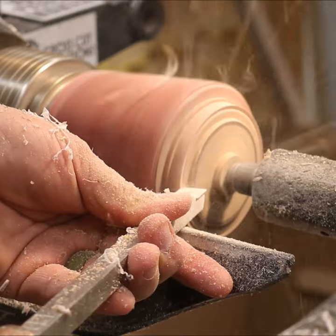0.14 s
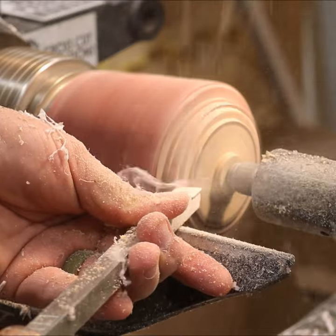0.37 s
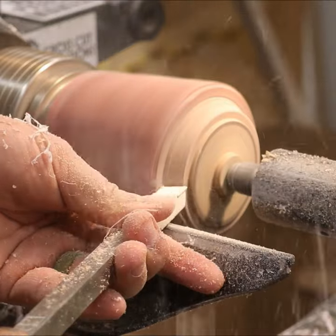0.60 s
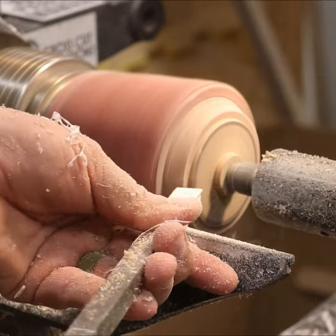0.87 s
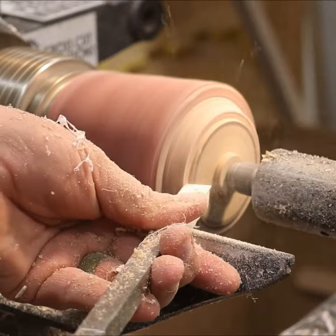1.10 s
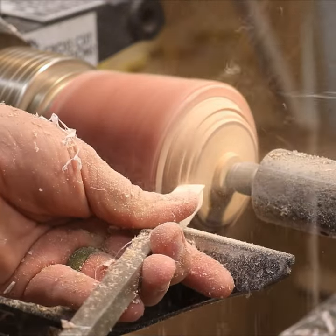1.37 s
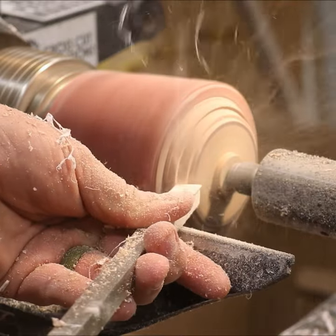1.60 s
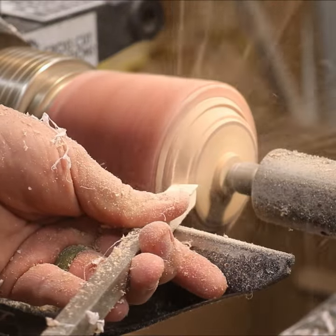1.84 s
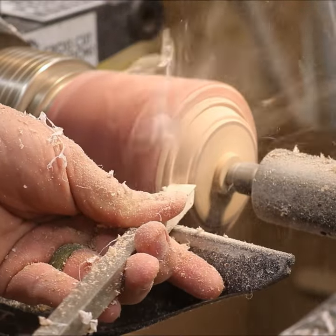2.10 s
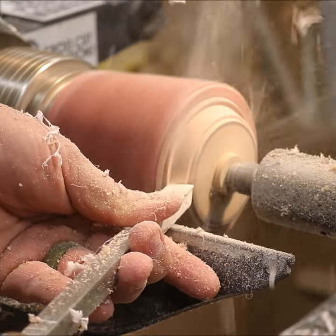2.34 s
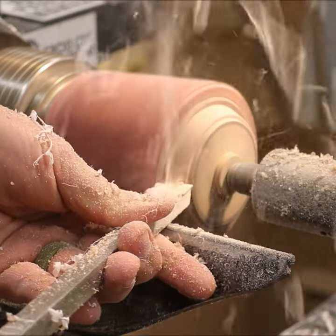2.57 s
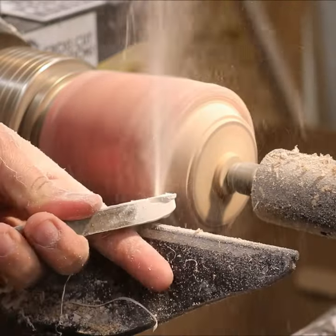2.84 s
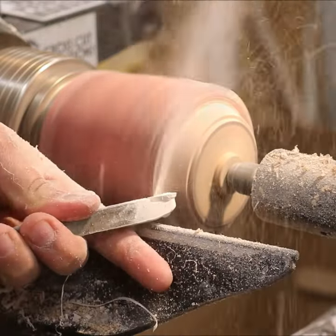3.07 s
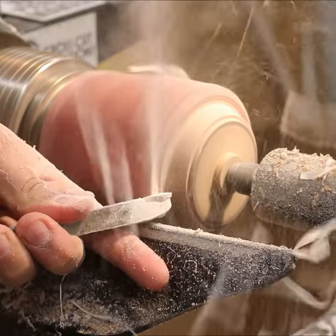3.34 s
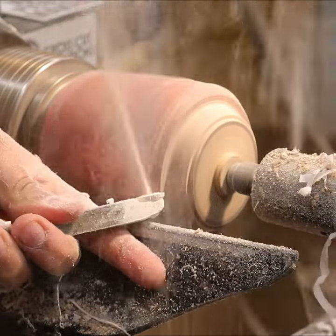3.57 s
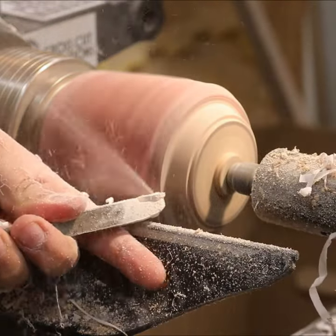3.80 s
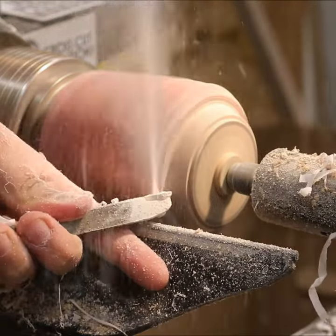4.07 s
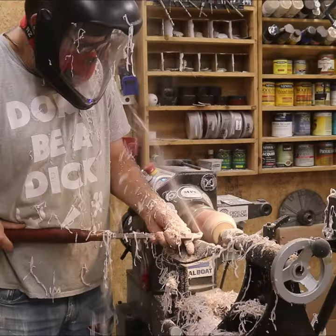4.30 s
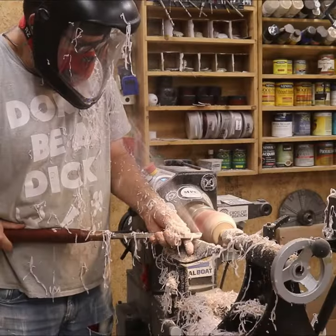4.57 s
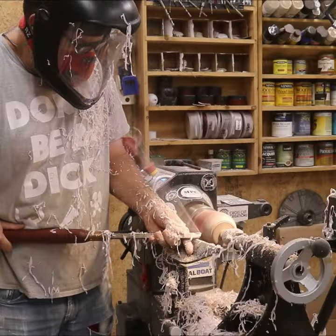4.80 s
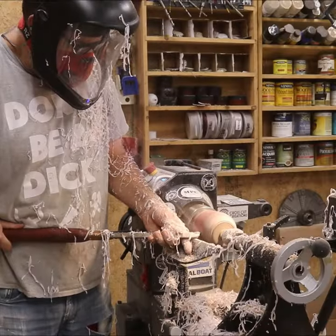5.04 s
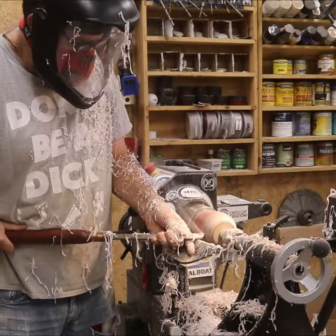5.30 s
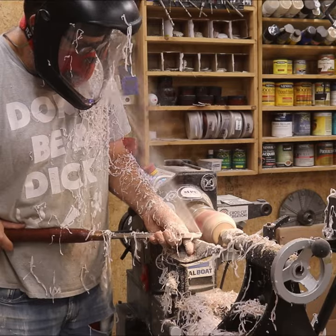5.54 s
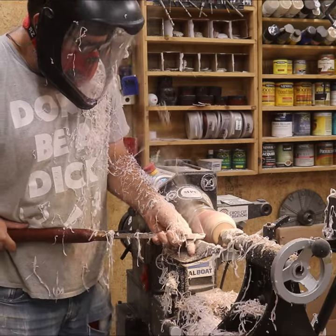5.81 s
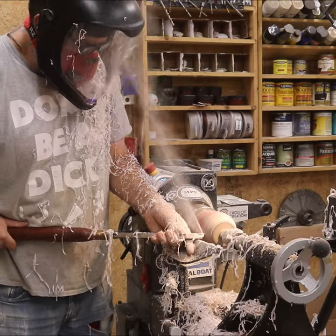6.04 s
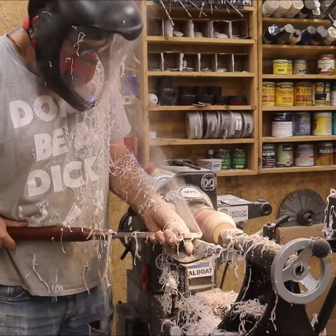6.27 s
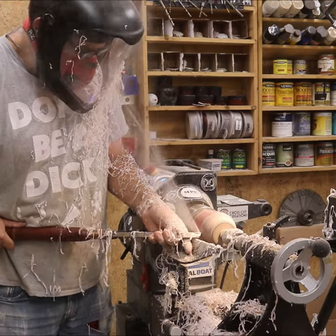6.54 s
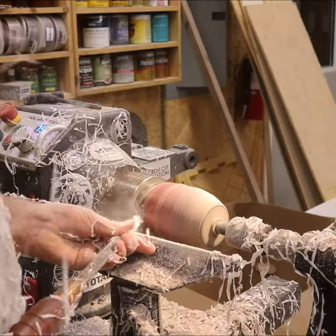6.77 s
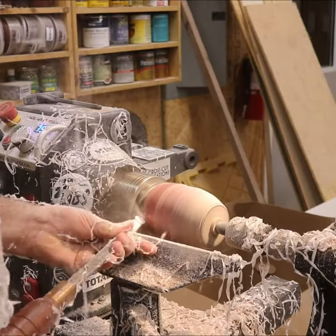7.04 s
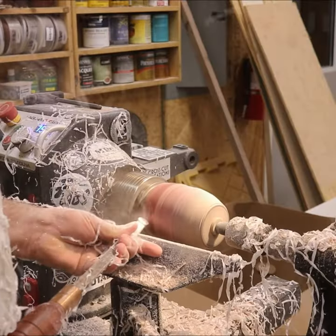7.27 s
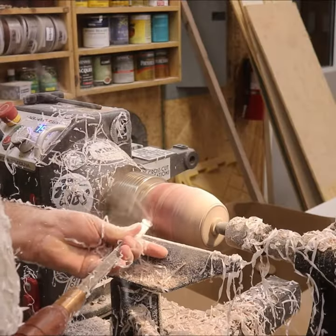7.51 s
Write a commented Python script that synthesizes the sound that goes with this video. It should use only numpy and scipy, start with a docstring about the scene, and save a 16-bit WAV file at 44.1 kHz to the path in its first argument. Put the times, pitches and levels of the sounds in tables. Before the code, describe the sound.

A fast lathe in a wood workshop, heard close and dry with little bass. From 0 s a gouge touches the spinning blank lightly; its raspy hiss repeats about 105 times a second, making a rough buzz. The cut swells from 0.1 s, lifts off around 0.6-1.1 s, exposing faint motor whine and hum, then bites with small snaps near 1.1-1.2 s. Until 3 s it is a steady, bright, hissing scrape with faint singing tones. At 3 s the colour shifts to a firmer, more nasal buzz, with chatter growing from 3.5 to 4 s. From 4.2 s cutting is rougher and uneven, with hard, squealing chatter around 4.5-5.1, 5.6-5.8 and 6.2-6.7 s. Sharp catches crack at 6.8 s; then a thinner, pulsing, brittle rasp with a strong hiss surge near 7.3 s continues to the 7.6 s end.

```python
"""In a wood shop, a gouge cuts a blank on a lathe, heard in four stretches one after another with the scene
changing between them, sped up so that the turns make a buzz. The edge meets nearly the same surface on every
turn, so the cutting noise, read from a slowly renewed random rim, repeats. In heavy cuts the tool chatters on a
group of sinusoids; the blank sings on multiples of the spin, and catches are decaying bursts of noise. The
drive whines on steady lines under shaped shop noise, with a low hum and rumble that are let through only in
windows of time."""
import sys
import numpy as np
from scipy import signal
from scipy.fft import rfft, irfft, next_fast_len
from scipy.io import wavfile
from scipy.ndimage import uniform_filter1d, map_coordinates

SR = 44100
rng = np.random.default_rng(int(sys.argv[2]) if len(sys.argv) > 2 else 0)


def field_ratio(decibels):
    """Amplitude ratio for a level in dB (20 dB per decade); scalars and array-likes work."""
    return 10 ** (np.asarray(decibels, dtype=float) / 20)


def pcm_store(signal):
    """Save signal as 16-bit PCM."""
    levels = np.round(np.clip(np.atleast_2d(signal), -1, 1) * 32767)
    wavfile.write(sys.argv[1], SR, levels.astype(np.int16).T)


N = 336924  # samples

# Spindle speed as heard, before a small random hunting. Each row: time in seconds, turns per second.
SPINDLE_SPEED = [(0, 105.96), (.4, 105.2), (.65, 105.85), (1.2, 105.95), (1.45, 105.35), (2.9, 105.4),
                 (3.5, 105.15), (4.0, 105.55), (4.2, 105.0), (4.35, 105.65), (5.2, 105.8), (5.5, 105.6),
                 (5.78, 104.9), (5.87, 105.6), (6.3, 104.85), (6.8, 105.3), (6.9, 105.0), (7.64, 104.4)]
# Slow course of the cut, one table a stretch between scene changes. Each row: time in seconds, then levels of
# blank, tool shank and shaving hiss in dB, before lifts and pushes.
CUT_COURSE = [
    [(0, -41.5, -46, -43), (.6, -45, -39, -29), (1.25, -42.5, -32.5, -30.5), (1.6, -44, -41.5, -29.5),
     (2.1, -45, -44, -34), (2.97, -40.5, -47.5, -31)],
    [(2.97, -36.5, -38, -30), (3.3, -39.5, -33, -34.5), (3.75, -32.5, -34, -35), (4.22, -43.5, -35, -31)],
    [(4.22, -37, -37.5, -34), (4.85, -36, -39.5, -32.5), (5.15, -42, -41.5, -31), (5.36, -37.5, -33.5, -35),
     (5.5, -39.5, -39, -32.5), (5.62, -43.5, -32, -31), (5.79, -30.5, -33, -32), (5.95, -39, -31.5, -31),
     (6.12, -43, -36, -29.5), (6.27, -45.5, -30, -31), (6.38, -37, -37, -31), (6.45, -39.5, -31.5, -31.5),
     (6.72, -35.5, -38, -36), (6.725, -48, -41.5, -38), (6.79, -37.5, -36, -32)],
    [(6.79, -47, -42.5, -29.5), (6.9, -38.5, -36, -26), (7.012, -49, -34.5, -29.5), (7.2, -44, -41, -35.5),
     (7.324, -50, -42.5, -20.5), (7.446, -41, -46.5, -39), (7.64, -52, -48, -29)],
]
# Borders between the bands of blank, shank and hiss, in Hz.
BAND_BORDERS = 3500, 7000
# Spectral colour, one table a stretch. Each row: frequency in Hz, relative density in dB per Hz.
PASS_COLOUR = [
    [(290, -90), (500, -17.5), (997, -13), (1540, -6), (1750, -21.5), (1950, -9.5), (2750, -8.5),
     (3800, -11.5), (7800, -2.5), (10500, -4.5), (12100, 1), (14500, -3)],
    [(290, -56), (500, -35.5), (618, -17), (1360, -9.5), (1540, -5.5), (1800, -36), (1930, -17),
     (4440, -6.5), (12800, -15), (14500, -10)],
    [(180, -44), (300, -20.5), (997, -10.5), (1230, -5.5), (1500, -10), (2240, -16), (4580, -13.5),
     (6440, -18.5), (7450, -25), (14500, -18.5)],
    [(290, -61), (500, -37.5), (1230, 13.5), (1780, -2.5), (2460, -1.5), (2870, -8), (4140, -12.5),
     (10300, -19), (12100, -18.5), (14500, -3)],
]
# Resonances of tool and blank, one table a stretch. Each row: centre in Hz, width in Hz, height in dB.
RESONANCES = [
    [(8300, 2300, 9.5), (12010, 600, 10.5), (5050, 2560, 14), (3070, 130, 5.5)],
    [(2460, 210, 11), (4500, 390, 7), (7580, 82, 13), (12730, 820, 13.5)],
    [(1318, 142, 11.5), (2314, 190, 14), (7566, 340, 15), (11890, 73, 10.5)],
    [(1186, 85, -19), (4200, 480, 7.5), (6750, 660, 7.5), (10300, 1350, 14)],
]
# The surface, one row a stretch. Each row: share kept from the last turn (0-1), share of fresh tearing (0-1),
# ridge depth in dB before the sharpness of each band, the opposite spot's share of the high spot (0-1).
RIM_SURFACE = [(.93, .07, 2.5, .65), (.94, .07, 3, .3), (.91, .13, 2.6, .3), (.9, .14, 2.0, 0)]
# Chatter, one table a spell. Each row: time in seconds, level in dB of the lowest strong line,
# place of the strongest line in spin steps above it.
CHATTER_SPELLS = [
    [(3.45, -72, .3), (3.56, -37, 0.14), (3.88, -31, 0.17), (3.93, -30.5, 0.46), (4.01, -71, 0.32)],
    [(4.45, -44, 0.41), (4.51, -39, 0.13), (4.63, -22, 0.88), (4.675, -33.5, 1), (4.71, -35, 0.14),
     (4.9, -23.5, 0.74), (4.96, -33, 0.34), (5.08, -32.5, 0.13), (5.14, -47, .3)],
    [(5.55, -43, 0.57), (5.65, -37.5, 0.082), (5.79, -31.5, 1), (5.83, -58, 0.62)],
    [(6.2, -47, 0.4), (6.36, -44, 0.15), (6.42, -24, 0.12), (6.58, -29, 0.28), (6.7, -24, 0.82),
     (6.722, -34.5, 1)],
]
# Whine of the drive. Each row: frequency in Hz at free spin, rms level in dB before the background gain.
WHINE_LINES = [(1141, -60), (1480, -65), (4447, -62.5), (4576, -49.5), (4705, -63)]
# Windows that let the low hum and rumble through. Each row: start in seconds, end in seconds, first dB, last dB.
LOW_WINDOWS = [(-.1, 0.175, -59, -54), (0.81, 1.22, -71, -59), (2.786, 2.88, -56, -66),
               (2.96, 3.533, -61.5, -71), (3.59, 4.087, -69.5, -64), (4.21, 6.818, -53.5, -60),
               (7.427, 7.7, -75, -59)]
# Spectral colour of the shop's broad noise. Each row: frequency in Hz, relative density in dB per Hz.
SHOP_COLOUR = [(500, 4), (1000, -3), (2000, 4.5), (4000, 1.5), (8000, -9), (14000, -4)]
# Course of the level of whine and shop noise. Each row: time in seconds, gain in dB.
BACKGROUND_GAIN = [(0, 5), (.12, 8), (.22, -5), (.75, -3), (1.1, 7), (1.3, -6), (2.0, -5), (2.8, -3),
                   (3.1, -4), (3.8, 2), (4.0, 4), (4.45, 5), (4.65, 7), (5.15, 7.5), (5.52, 8.5),
                   (5.63, -2), (5.9, 4), (6.15, -8), (6.9, -12), (7.64, 0)]
# The blank's singing tones. Each row: start in seconds, end in seconds, cycles per turn, first dB, last dB.
SINGING_TONES = [(0.166, 0.43, 15, -51, -51), (1.307, 2.97, 15, -56.5, -51), (1.3, 2.9, 13, -66, -60.5),
                 (2.097, 2.812, 27, -44, -57), (2.148, 2.82, 30, -48.5, -52), (2.447, 2.72, 52, -50, -46),
                 (2.99, 3.9, 42, -54, -41), (4.264, 5.0, 44, -36.5, -46), (6.92, 7.158, 40, -42, -43),
                 (2.973, 3.898, 15, -38, -32), (3.893, 4.227, 15, -42, -44.5),
                 (3.08, 3.736, 19, -48, -39.5), (4.246, 5.82, 13, -85, -32.5),
                 (5.92, 6.447, 12, -40.5, -34), (6.19, 6.714, 13, -43.5, -39),
                 (6.917, 7.246, 24, -41, -39.5), (6.933, 7.617, 12, -48, -47), (6.916, 6.976, 19, -31, -39)]
# Lifts of the edge off the wood. Each row: start in seconds, end in seconds, depth in dB before the shares
# below, time to fall in seconds.
EDGE_LIFTS = [(-.1, 0.116, 9.5, .01), (0.602, 0.705, 6.5, 0.015), (0.712, 0.871, 11, 0.03),
              (0.869, 1.111, 20, 0.072), (1.171, 1.217, 3, 0.0054), (6.776, 6.82, 2, 0.0047)]
# How far blank, shank and hiss follow a lift, as factors on its dB.
BAND_LIFT_SHARES = 1, 1, 1.83
# The hand presses (+) or eases (-). Each row: time in seconds, half length in seconds, change in dB,
# lean from blank to hiss in dB.
HAND_PUSHES = [(0.166, 0.13, 6, 6.5), (0.383, 0.16, 3.5, 1.8), (0.544, 0.047, 4.5, 3.5),
               (0.685, 0.032, 10, 3), (0.857, 0.039, -14.5, 8), (1.473, 0.025, 6.5, 0),
               (1.798, 0.17, 3.5, -1.5), (1.937, 0.059, 3.5, 0.5), (2.162, 0.081, 5.5, 1.5),
               (2.326, 0.11, 3, 0), (2.477, 0.029, 7, -1.5), (2.606, 0.091, 5, -2.5),
               (2.748, 0.089, 4, -0.5), (2.913, 0.069, 4, 0.5), (4.573, 0.06, 3, 1), (5.225, 0.039, 5.5, 1),
               (5.288, 0.037, -8, 6.5), (5.502, 0.023, -15, 10), (5.576, 0.078, 3, 0),
               (5.843, 0.086, -12.5, 1.5), (6.937, 0.038, 8, -2.5), (7.241, 0.06, 3.5, -3.5),
               (7.548, 0.028, -8.5, 0)]
# Catches of the edge. Each row: time in seconds, nominal peak in dB.
EDGE_CATCHES = [(1.119, -24), (1.2183, -19), (2.978, -25), (6.8158, -9.5), (6.824, -18), (6.854, -16)]
# How far the high spot of the rim stands out, before the sharpness of each band.
# Each row: time in seconds, height in dB.
HIGH_SPOT = [(.4, 11), (.62, 5), (1.3, 9), (2.9, 6), (3.0, 3), (6.81, 2), (6.82, 15), (6.85, 13),
             (6.865, 3), (6.92, 5), (6.96, 19), (7.3, 9)]

SPOT_AT_S = 6.996  # a moment when the high spot meets the edge
FREE_SPIN = 105.96  # turns per second as heard
CHATTER_PER_TURN = 10.76  # cycles per turn
RETURN_S, BITE_DB, BITE_S = .006, 5, 0.049  # return from a lift; rise of the bite and its decay time
HUM_HZ, SHOP_DB = 240.4, -48.5  # the noise level is before the background gain
TOP_HZ = 14650


def cutting(turns):
    """Sequential excitation: the scene changes between stretches that follow one another, each with its own
    colour and surface."""
    out, levels_db = np.zeros((2, N)), grip()
    spot_db = in_time(HIGH_SPOT)[0]
    starts = [round(rows[0][0] * SR) for rows in CUT_COURSE[1:]]
    stretches = zip([0] + starts, starts + [N], PASS_COLOUR, RESONANCES, RIM_SURFACE)
    for a, b, colour, rings, surface in stretches:
        place = np.arange(b - a)
        ends = np.minimum(np.minimum(place, place[::-1]) / 60, 1)  # fades over 60 samples
        out[:, a:b] = ends * one_stretch(turns[a:b], colour, rings, surface, levels_db[:, a:b], spot_db[a:b])
    return out


def one_stretch(turns, colour, rings, surface, levels_db, spot_db):
    """Amplitude modulation of tearing noise by ridges and high spots, deepest in the treble; gives mid and side."""
    kept, fresh, ridge_db, opposite = surface
    fresh = np.clip(fresh, 0, 1)
    shared = round_the_blank(turns, 0.908, size=16)
    out = np.zeros((2, len(turns)))
    high_spot = np.exp(5 * (np.cos(2 * np.pi * turns) - 1))
    lesser_spot = opposite * np.exp(5 * (-np.cos(2 * np.pi * turns) - 1))
    spot = spot_db * (1 + .15 * round_the_blank(turns, .7, size=300)) * (high_spot + lesser_spot)
    highpass = signal.butter(4, 1420, "high", fs=SR, output="sos")
    # blank, shank, hiss: sharpness, memory, lasting share, side dB
    bands = [(.45, 1.0, .5, -13), (.9, .99, .4, -13.5), (1.0, .88, .2, -13)]
    for k, (sharp, memory, lasting, side_db) in enumerate(bands):
        rough = np.minimum(0.83 * shared + 1.1 * round_the_blank(turns, 0.54, size=16), 2.1)
        ridges = field_ratio(sharp * (ridge_db * rough + spot))
        for side in (0, 1):
            renewed = round_the_blank(turns, kept * memory)
            rim = np.sqrt(lasting) * rim_shape(turns) + np.sqrt(1 - lasting) * renewed
            torn = rng.standard_normal(len(turns))
            tearing = np.sqrt(1 - sharp * fresh) * rim + np.sqrt(sharp * fresh) * torn
            band = coloured(ridges * tearing, lambda hz: band_db(hz, k, colour, rings))
            above_chatter = signal.sosfilt(highpass, band)  # the part that sets the level
            out[side] += field_ratio(levels_db[k] + side * side_db) * band / np.std(above_chatter)
    return out


def band_db(hz, k, colour, rings):
    """Resonant filtering: peaks of tool and blank on the stretch's colour, limited to band k."""
    edges = (1, *BAND_BORDERS, SR)
    body = at_hz(colour, hz)
    for centre, width, db in rings:
        body = body + db / (1 + (2 * (hz - centre) / width) ** 2)
    return body - 10 * np.log10((1 + (edges[k] / (hz + 1)) ** 10) * (1 + (hz / edges[k + 1]) ** 10))


def round_the_blank(turns, kept, count=420, size=1):
    """Regenerative surface: random points round the rim, partly renewed each turn, read by the spin; rms 1."""
    fresh = rng.standard_normal((int(turns[-1] - turns[0]) + 42, count))
    for _ in range(2):
        fresh = uniform_filter1d(fresh, size, mode="wrap")
    rim = signal.lfilter([1], [1, -np.clip(kept, 0, .98)], fresh, axis=0)[40:].ravel()
    return rms_one(map_coordinates(rim, [(turns - turns[0]) * count], order=3))


def rim_shape(turns, count=420, uneven_db=3.5):
    """Periodicity: the lasting rim is the same on every turn, some multiples of the spin stronger than others."""
    strength = field_ratio(uneven_db * rng.standard_normal(count // 2 + 1))
    phase = np.exp(2j * np.pi * rng.random(count // 2 + 1))
    rim = irfft(strength * phase, count)
    return rms_one(map_coordinates(rim, [turns % 1 * count], order=3, mode="grid-wrap"))


def grip():
    """Contact pressure sets the levels in dB of blank, shank and hiss: slow course, lifts, bites and pushes."""
    t, levels_db = np.arange(N) / SR, np.array(in_time(np.concatenate(CUT_COURSE)))
    for start, end, depth_db, fall_s in EDGE_LIFTS:
        off = np.clip(np.minimum((t - start) / fall_s, (end - t) / RETURN_S + .5), 0, 1)
        bite = (t > end) * np.exp(-np.abs(t - end) / BITE_S)
        levels_db += BITE_DB * bite - depth_db * off * np.array(BAND_LIFT_SHARES)[:, None]
    for s, half_s, push_db, lean_db in HAND_PUSHES:
        press = np.maximum(1 - np.abs(t - s) / half_s, 0)
        levels_db += press * (push_db + lean_db * np.array([[-1], [0], [1]]))
    return levels_db


def patchy(x, depth_db=3.0):
    """Varying resonance: as the grip shifts, slow random gains move over time and pitch, deepest in the treble."""
    hz, _, spectra = signal.stft(x, SR, nperseg=512)
    chance = rng.standard_normal(spectra.shape[1:])
    for axis, size in ((0, 3), (1, 30)):  # smoothed twice over pitch, then over time
        for _ in range(2):
            chance = uniform_filter1d(chance, size, axis=axis)
    depth_db = depth_db * np.clip(hz / 4500, .5, 1)[:, None]
    return signal.istft(spectra * field_ratio(depth_db * rms_one(chance)), nperseg=512)[1][:, :N]


def chatter(turns, spread=.65, overtone_db=-20, waver_db=1.8, rasp_db=-13):
    """Modulated self-oscillation: a tone swelling once a turn gives lines a spin step apart, an octave and a rasp."""
    out = np.zeros(N)
    rasp_band = signal.butter(2, [2100, 3400], "band", fs=SR, output="sos")
    rasp = rms_one(signal.sosfilt(rasp_band, rng.standard_normal(N)))
    for rows in CHATTER_SPELLS:
        start, end = rows[0][0], rows[-1][0]
        span = slice(int(start * SR), int(end * SR))
        level_db, place = (c[span] for c in in_time(rows))
        angle = 2 * np.pi * turns[span]
        fade = stretch(start, end, .003, 0, 0)[span]
        out[span] += fade * field_ratio(level_db + rasp_db) * (1 + 0.86 * np.cos(angle)) * rasp[span]
        for step in range(-2, 5):
            # bell over the lines, relative to line 0
            line_db = -8.7 * ((step - place) ** 2 - place ** 2) / (2 * spread ** 2)
            line_db = line_db + waver_db * drift(7.6)[span]
            tone = np.cos((CHATTER_PER_TURN + step) * angle)
            tone += field_ratio(overtone_db) * np.cos((2 * CHATTER_PER_TURN + step) * angle)
            out[span] += fade * field_ratio(level_db + line_db) * np.sqrt(2) * tone
    return out


def singing(turns):
    """Forced resonance: tones on multiples of the spin; the prouder the high spot, the more they swell each turn."""
    swell = 1 + np.minimum(in_time(HIGH_SPOT)[0] / 22, 1) * np.cos(2 * np.pi * (turns - .12))
    tones = np.zeros(N)
    for start, end, multiple, first_db, last_db in SINGING_TONES:
        gain = stretch(start, end, 0.011, first_db, last_db) * field_ratio(1.2 * drift(4.3))
        tones += gain * np.sqrt(2) * np.sin(2 * np.pi * round(multiple) * turns)
    return swell * tones


def catches(decay_s=0.002):
    """Impulsive excitation: each catch is a bright noise burst with rapid exponential decay."""
    t = np.arange(N) / SR
    envelope = sum(field_ratio(db - 5.5) * (t > s) * np.exp(-np.abs(t - s) / decay_s) for s, db in EDGE_CATCHES)
    snaps = envelope * rng.standard_normal(N)
    return signal.sosfilt(signal.butter(2, [1500, 11000], "band", fs=SR, output="sos"), snaps)


def drive(turns):
    """Rotating machinery: whine lines and broad noise of motor and shop, over a windowed low hum and rumble."""
    t = np.arange(N) / SR
    motor_t = (t + turns / FREE_SPIN) / 2  # the belt slips: the motor sags half as much as the spindle
    whine = np.zeros(N)
    for hz, db in WHINE_LINES:
        whine += field_ratio(db + 2.0 * drift(6.0)) * np.sin(2 * np.pi * hz * motor_t + 0.6 * drift(5.8))

    def shop_db(hz):
        return at_hz(SHOP_COLOUR, hz) - 40 * (hz < 600)

    shop = np.array([coloured(rng.standard_normal(N), shop_db) for side in (0, 1)])
    highs = np.sqrt(2) * whine * field_ratio([[0], [-14]]) + field_ratio(SHOP_DB) * shop * field_ratio([[0], [-8]])  # mid, side
    rumble_band = signal.butter(3, [200, 330], "band", fs=SR, output="sos")
    rumble = rms_one(signal.sosfilt(rumble_band, rng.standard_normal((2, N))))
    rumble = field_ratio([[-8], [-11]]) * field_ratio(2 * drift(3)) * rumble
    hum = field_ratio(2 * drift(17)) * np.sqrt(2) * np.sin(2 * np.pi * HUM_HZ * t) * field_ratio([[0], [-20]])
    window = sum(stretch(start, end, 0.052, *levels_db) for start, end, *levels_db in LOW_WINDOWS)
    return field_ratio(in_time(BACKGROUND_GAIN)[0]) * highs + window * (hum + rumble)


def stretch(start, end, edge_s, first_db, last_db):
    """Envelope: a gain that fades in, slides between two levels in dB and fades out."""
    t = np.arange(N) / SR
    fade = np.clip(np.minimum(t - start, end - t) / edge_s, 0, 1)
    return fade * field_ratio(np.interp(t, [start, end], [first_db, last_db]))


def drift(rate):
    """Low-passed random process: a slow wander of rms 1, with both filter poles at rate in Hz."""
    r = np.exp(-80 * np.pi * rate / SR)  # computed on every 40th sample
    slow = signal.lfilter([1], [1, -2 * r, r * r], rng.standard_normal(N // 40 + 2002))[2000:]
    return np.interp(np.arange(N) / 40, np.arange(len(slow)), rms_one(slow))


def coloured(x, db_at):
    """Linear filtering: shapes the spectrum of x by a law in dB over frequency; rms 1."""
    size = next_fast_len(len(x))
    gain = field_ratio(db_at(np.fft.rfftfreq(size, 1 / SR)))
    return rms_one(irfft(rfft(x, size) * gain, size)[:len(x)])


def rms_one(x):
    """Normalisation to unit root mean square."""
    return x / np.sqrt(np.mean(x ** 2) + 1e-20)


def in_time(rows):
    """Linear interpolation of a table's columns over every sample."""
    s, *columns = np.transpose(rows)
    return [np.interp(np.arange(N) / SR, s, c) for c in columns]


def at_hz(points, hz):
    """Interpolation of dB on a logarithmic frequency axis."""
    points_hz, points_db = np.transpose(points)
    return np.interp(np.log(hz + 1), np.log(points_hz), points_db)


def scene():
    """Superposition: the sources add as mid and side, then spread to left and right."""
    turns = np.cumsum(in_time(SPINDLE_SPEED)[0]) / SR + 0.004 * drift(7.9)  # the spindle hunts a little
    turns = turns - turns[int(SPOT_AT_S * SR)]
    tones = chatter(turns) + singing(turns) + catches()
    tones = tones * [[1], [-1]] * field_ratio([[0], [-26]])  # mid, side
    mid, side = patchy(cutting(turns)) + tones + drive(turns)
    return np.array([mid + side, mid - side]) * field_ratio([[-1.0], [.7]])  # the right is a little louder


def roll_off(x):
    """The treble ends steeply here."""
    return signal.sosfilt(signal.butter(12, 15840, fs=SR, output="sos"), x)


def record(dry):
    """Band limiting: the microphone cuts the bass, and the top ends steeply."""
    thin = signal.sosfilt(signal.butter(6, 185, "high", fs=SR, output="sos"), dry)
    thin = signal.sosfilt(signal.cheby2(14, 45, TOP_HZ + 250, fs=SR, output="sos"), thin)
    return roll_off(thin)


dry = scene()
out = record(dry)
pcm_store(out)
```